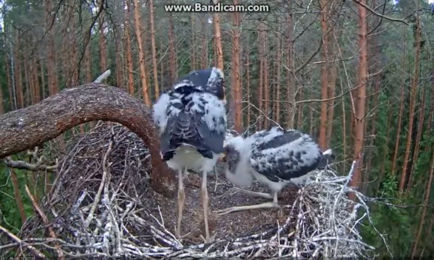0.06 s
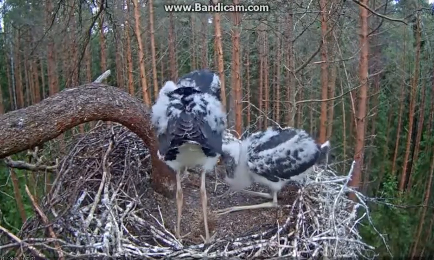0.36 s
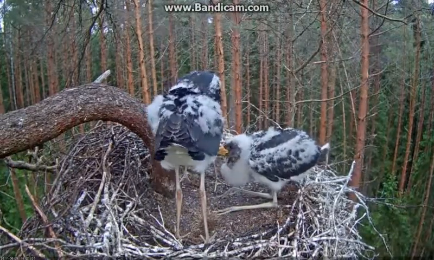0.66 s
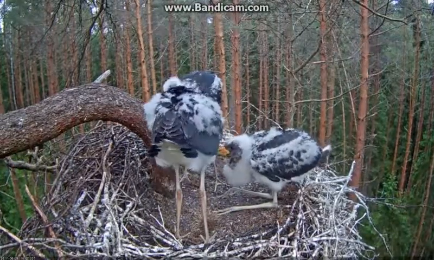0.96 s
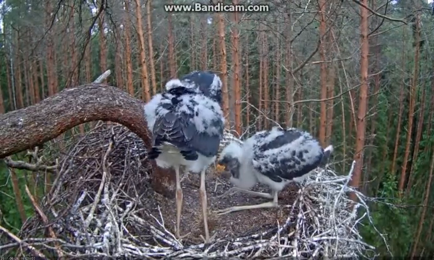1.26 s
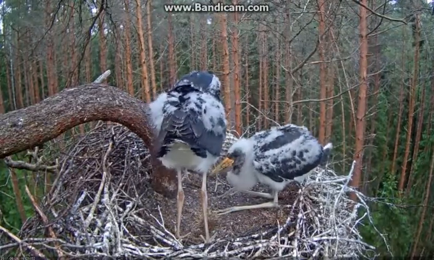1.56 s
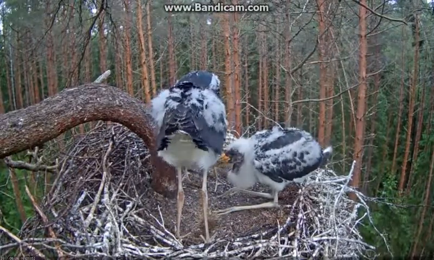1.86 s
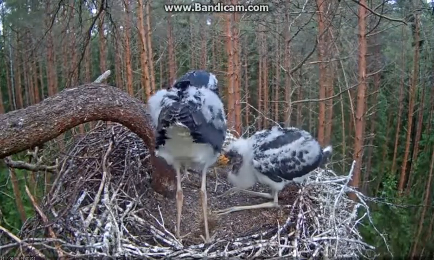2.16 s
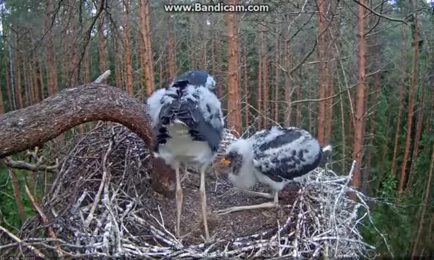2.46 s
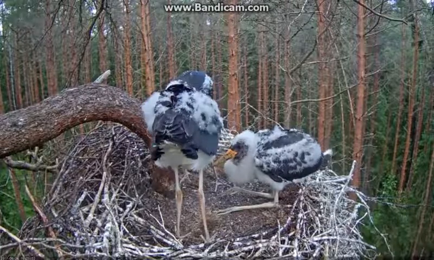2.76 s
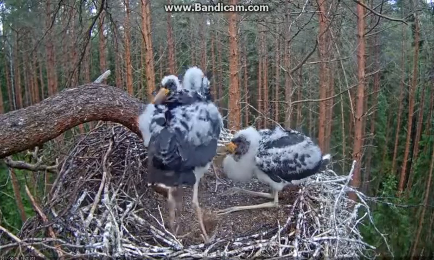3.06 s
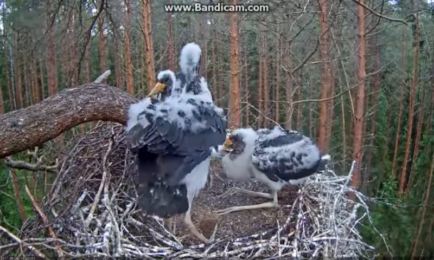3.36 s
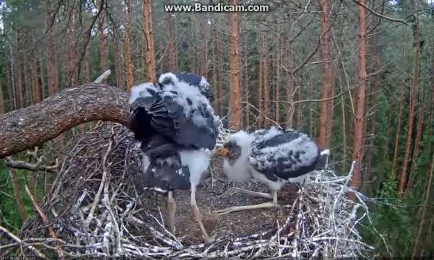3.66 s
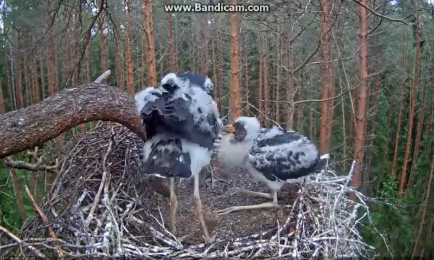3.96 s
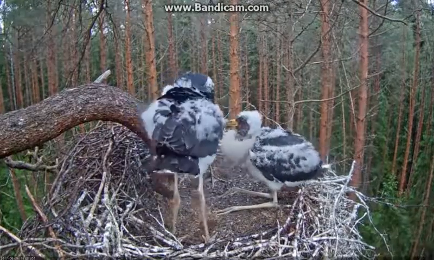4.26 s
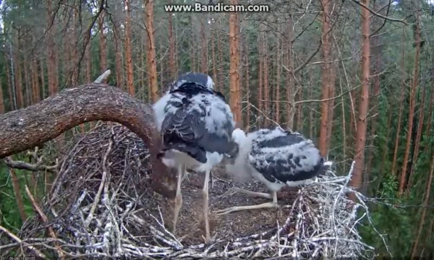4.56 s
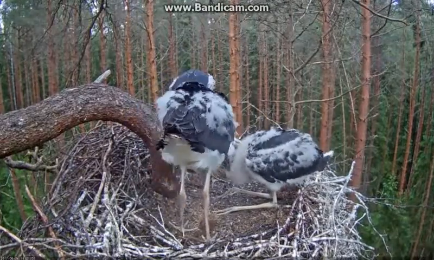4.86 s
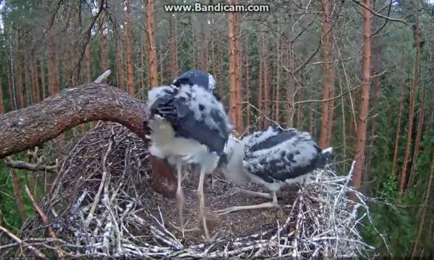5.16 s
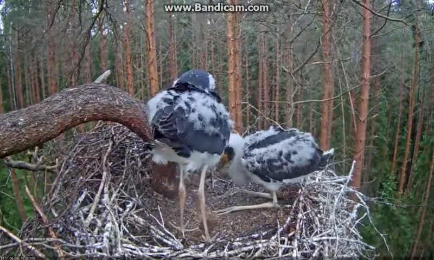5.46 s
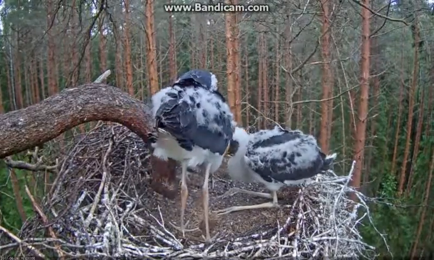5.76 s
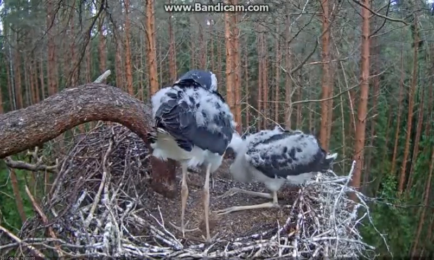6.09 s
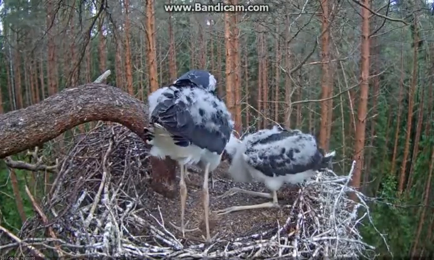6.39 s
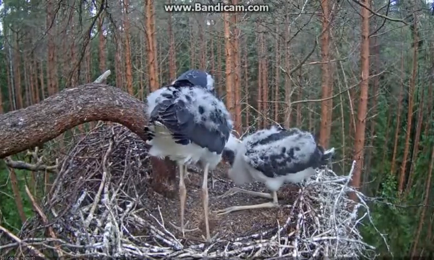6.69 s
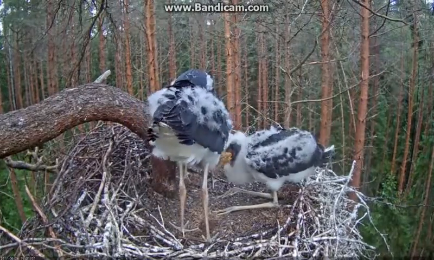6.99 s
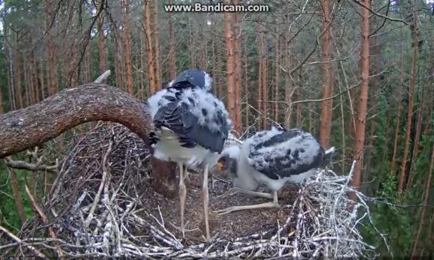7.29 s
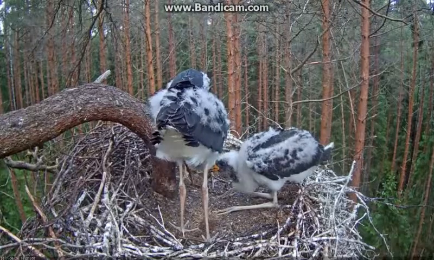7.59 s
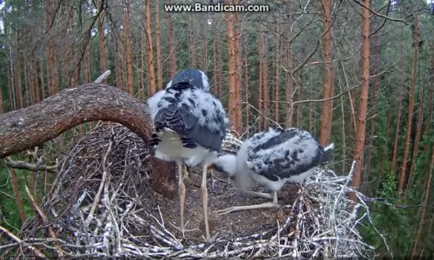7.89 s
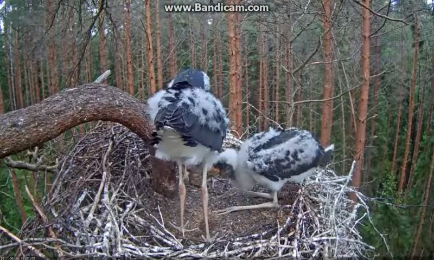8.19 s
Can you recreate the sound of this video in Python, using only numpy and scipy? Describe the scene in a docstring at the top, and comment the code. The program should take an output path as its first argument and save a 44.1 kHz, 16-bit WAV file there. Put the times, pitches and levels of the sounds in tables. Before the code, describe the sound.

Stork chicks beg on a stick nest in a pine forest. One calls in fast runs of about nine syllables a second, each a high whistled squeak ending in a rattling rasp and a small grunt, with brief pauses between runs. A second chick adds lower, wavering squeals in the later half. Feathers rustle, feet tick faintly on sticks and a small bird sings far off. The microphone sits beside the nest, in a steady soft hush.

```python
"""Stork chicks beg on a stick nest in a pine forest, about nine syllables a second.
In each syllable the syrinx whistles an arch of pitch that cracks into a short level note; then slack
membranes drive the throat with a pulse train, heard as a rattling rasp with a low grunt.
A second chick joins in lower down, feet excite the damped modes of the sticks, feathers rustle and
a small bird sings far off. The trunks scatter a short reverberation over the hush of the forest."""
import sys
import numpy as np
from scipy import signal
from scipy.fft import rfft, irfft, next_fast_len
from scipy.io import wavfile
from scipy.ndimage import map_coordinates

SR = 44100
rng = np.random.default_rng(int(sys.argv[2]) if len(sys.argv) > 2 else 0)


def wrap_up_sound(samples):
    """Save the sound to the file named by the first command line argument, as 16-bit audio."""
    columns = np.atleast_2d(samples).T
    # keep every value between -1 and 1, then stretch to whole-number steps
    tamed = np.clip(columns, -1, 1)
    steps = np.round(tamed * 32767).astype(np.int16)
    wavfile.write(sys.argv[1], SR, steps)


N = 372204
TIME = np.arange(N) / SR
TYPICAL_DB = -20   # reference level of a syllable

# begging syllables: (arch start t/s, arch end t/s, top f/Hz, rise level/dB, fall level/dB,
# grunt level/dB)
SYLLABLES = [(0.253, 0.29, 4530, -27, -18.5, -29.5), (0.33, 0.382, 3920, -20.5, -26, -22),
             (0.424, 0.481, 4510, -19.5, -20, -27), (0.552, 0.6, 4810, -15.5, -13, -24),
             (0.65, 0.699, 4700, -18, -15, -25), (0.758, .808, 5040, -16.5, -12.5, -22),
             (0.867, 0.915, 4890, -17, -13.5, -22), (0.966, 1.027, 4960, -19, -20.5, -26.5),
             (1.153, 1.206, 5300, -21.5, -46, -24.5), (1.267, 1.308, 3820, -23, -35, -79),
             (1.432, 1.471, 4580, -27, -18.5, -44), (1.514, 1.564, 4840, -16, -23, -29),
             (1.616, 1.673, 4600, -19.5, -21, -26), (1.73, 1.792, 4550, -21, -17, -35),
             (1.84, 1.906, 5020, -13.5, -15, -37), (1.95, 2.016, 4700, -16, -15.5, -40),
             (2.067, 2.136, 4900, -15, -10.5, -35), (2.181, 2.248, 4550, -16.5, -19, -25.5),
             (2.332, 2.41, 5150, -16.5, -75, -103), (2.593, 2.632, 4410, -33.5, -25, -56),
             (2.773, 2.827, 4650, -22.5, -22, -34), (2.882, 2.941, 4690, -20.5, -18.5, -36),
             (2.987, 3.057, 4550, -17.5, -16, -22), (3.101, 3.177, 4520, -13, -18, -24.5),
             (3.217, 3.284, 4620, -14, -16, -24), (3.335, 3.39, 4730, -11, -16, -22),
             (3.762, 3.801, 4140, -23, -21, -68), (3.817, 3.873, 3990, -18.5, -21, -19.5),
             (3.923, 3.979, 3960, -17, -26, -21), (4.022, 4.084, 4010, -15.5, -16.5, -22.5),
             (4.137, 4.211, 4160, -14, -22, -26), (4.256, 4.323, 4320, -15, -14.5, -26),
             (4.365, 4.434, 4470, -15, -11.5, -45), (4.475, 4.544, 4720, -15, -16, -72),
             (4.586, 4.645, 4700, -14, -13, -24.5), (4.826, 4.852, 3700, -45, -41, -71),
             (4.959, 5.019, 4730, -21, -24, -47), (5.05, 5.111, 4350, -18, -23.5, -28.5),
             (5.158, 5.217, 4460, -22, -26, -30), (5.268, 5.317, 4080, -19.5, -32, -37),
             (5.367, 5.433, 4800, -16.5, -22, -32), (5.488, 5.54, 4680, -20.5, -20, -73),
             (5.579, 5.65, 5220, -12, -11.5, -22.5), (5.687, 5.752, 4480, -16, -14, -30),
             (5.787, 5.85, 4190, -25.5, -15, -24.5), (6.168, 6.205, 4490, -28, -34, -55),
             (6.252, 6.302, 4480, -24.5, -26, -29), (6.36, 6.409, 4510, -24, -26, -30.5),
             (6.457, 6.522, 4780, -16, -29, -23.5), (6.568, 6.632, 4580, -16.5, -25, -29.5),
             (6.668, 6.744, 4550, -14, -15.5, -31), (6.786, 6.856, 4300, -12, -13.5, -27),
             (6.899, 6.966, 4420, -12.5, -14.5, -29), (7.015, 7.072, 4980, -12, -33, -29.5),
             (7.134, 7.176, 5300, -16.5, -53, -35), (7.239, 7.295, 4430, -38, -46, -28),
             (7.367, 7.42, 4800, -34, -36, -48), (7.462, 7.519, 4470, -18, -28, -40),
             (7.568, 7.633, 5070, -20, -23, -46), (7.675, 7.747, 4400, -19, -24, -55),
             (7.78, 7.854, 4250, -21.5, -20.5, -29), (7.901, 7.968, 4000, -26, -27, -25.5),
             (8.017, 8.075, 3805, -18.5, -21.5, -26), (8.131, 8.18, 4420, -38, -49, -71),
             (8.279, 8.347, 4170, -33, -66, -44)]
# fundamental of the grunts: (t/s, f/Hz)
GRUNT_PITCH = [(.4, 332.6), (1.06, 324.7), (1.24, 410.7), (2.17, 430), (2.28, 333), (2.8, 400), (4.4, 397),
               (4.68, 345.2), (5.2, 411), (5.7, 313.2), (5.9, 306.6), (6.4, 460), (7, 454), (8, 348.3)]


def from_db(db):
    """Amplitude ratio of a level: a factor of ten for every 20 dB."""
    return 10 ** (np.asarray(db) / 20)


def drift(rate, size):
    """Band-limited fluctuation: a spline through `rate` random values a second, spread about 1."""
    position = np.arange(size) * rate / SR
    return map_coordinates(rng.standard_normal(4096), [position], order=3, mode="wrap")


def colour(x, spectrum):
    """Minimum-phase filter with the shape of the given spectrum; white noise keeps its power."""
    size = 2 * next_fast_len(N // 2 + 4096)
    hz, db = np.transpose(spectrum)
    bins_hz = np.fft.rfftfreq(size, 1 / SR)
    gain = from_db(np.interp(np.log(bins_hz + 1), np.log(hz), db))
    gain /= np.sqrt(np.mean(gain ** 2))
    cepstrum = irfft(np.log(gain))
    cepstrum[1:size // 2] *= 2   # folding the cepstrum makes the filter causal
    cepstrum[size // 2 + 1:] = 0
    return irfft(rfft(x, size) * np.exp(rfft(cepstrum)))[:N]


def span(start, end):
    """The sampling instants between two times."""
    return TIME[max(int(start * SR), 0):max(int(end * SR), 2)]


def add(track, t, sound):
    """Superposition: a sound adds to the track at its sampling instants."""
    track[np.round(t * SR).astype(int)] += sound


def gate(t, start, end, edge):
    """Amplitude window from start to end, with smooth flanks of time scale `edge`."""
    return (1 + np.tanh((t - start) / edge)) * (1 + np.tanh((end - t) / edge)) / 4


def whistle(hz, overtone_db):
    """Oscillator whose phase is the integral of frequency, with a flickering second harmonic."""
    phase = 2 * np.pi * np.cumsum(hz) / SR
    overtone = from_db(overtone_db) * (1 + .5 * drift(886, len(hz)))
    return np.sqrt(2) * (np.sin(phase) + overtone * np.sin(2 * phase))


def glide(start, end, from_hz, to_hz, db, scatter_hz, flutter_db, overtone_db, waver_hz=0):
    """A linear sweep; random frequency modulation broadens it from a pure tone to a buzz."""
    out, t = np.zeros(N), span(start - .01, end + .01)
    hz = np.interp(t, [start, end], [from_hz, to_hz]) + scatter_hz * drift(1092, len(t))
    hz -= waver_hz * np.sin(np.pi * (t - start) / .055) ** 2   # one dip every 55 ms
    swell = from_db(db + flutter_db * drift(239.5, len(t))) * gate(t, start + .00024, end - .002, .0053)
    add(out, t, swell * whistle(hz, overtone_db))
    return out


def forest(level_db=-35):
    """Ambient noise: a broad continuous spectrum whose level wavers slightly."""
    # spectrum of the forest: (f/Hz, relative level/dB)
    spectrum = [(18, -56), (30, -30), (152, -3), (320, 3), (1100, -20), (1570, -16), (2040, -17),
                (2770, -23.5), (4630, -9), (7170, -14.5), (13000, -26.5), (14000, -36.5)]
    return from_db(level_db + drift(17, N)) * colour(rng.standard_normal(N), spectrum)


def feathers():
    """Brushing and flapping plumage radiates low, amplitude-modulated noise."""
    # envelope of the rustle: (t/s, level/dB)
    rustle = [(0, -52), (2.68, -60), (2.83, -39.5), (3.13, -30.5), (3.45, -64), (4.3, -45), (5.1, -50),
              (5.6, -40), (6.06, -33), (6.5, -40.5), (7.1, -61)]
    # spectrum of the plumage: (f/Hz, relative level/dB)
    plumage = [(25, -17), (60, 0.5), (130, 0.5), (250, 5.5), (450, -24), (1000, -79)]
    db = np.interp(TIME, *np.transpose(rustle)) + 2 * drift(40, N)
    return from_db(db) * colour(rng.standard_normal(N), plumage)


def songbird(slur_from_hz=3700, slur_to_hz=3010, buzz_end_ratio=.9):
    """Falling sweeps of a small bird: weak frequency modulation gives slurs, strong gives buzzes."""
    # pure down-slurs: (start t/s, end t/s, level/dB)
    slur_notes = [(.003, 0.051, -37), (0.109, 0.116, -25.5), (0.185, 0.191, -22.5), (3.515, 3.536, -29),
                  (3.681, 3.703, -24.5)]
    # buzzes: (start t/s, end t/s, start f/Hz, level/dB)
    buzz_notes = [(1.265, 1.378, 6910, -33), (1.36, 1.409, 5840, -34), (3.443, 3.51, 4950, -29),
                  (3.542, 3.63, 4200, -34.5), (3.632, 3.68, 4850, -30.5)]
    slurs = sum(glide(start, end, slur_from_hz, slur_to_hz, db,
                      scatter_hz=30, flutter_db=5, overtone_db=-47)
                for start, end, db in slur_notes)
    buzzes = sum(glide(start, end, hz, hz * buzz_end_ratio, db,
                       scatter_hz=242, flutter_db=4, overtone_db=-47)
                 for start, end, hz, db in buzz_notes)
    return slurs + buzzes


def steps(level_db=-4):
    """Impact excitation: each footfall sets the sticks ringing in exponentially damped modes."""
    # feet on the nest: (t/s, relative level/dB)
    footfalls = [(.01, -43), (0.155, -52), (0.205, -54), (0.226, -44), (1.342, -44), (1.373, -46.5),
                 (2.283, -39.5), (2.306, -41), (2.562, -47.5), (3.653, -49), (3.737, -47.5), (4.3, -42.5)]
    # modes of the sticks: (f/Hz, relative level/dB, 60 dB decay time t/s)
    modes = [(299.6, 28.5, 0.088), (444, 25, 0.031), (646, 21.5, 0.056), (1277, 17, 0.042),
             (1420, 18, 0.018), (2460, 17, 0.03)]
    knocks = np.zeros(N)
    for start, force_db in footfalls:
        t = span(start, start + .081)
        age = t - t[0]
        for hz, mode_db, t60 in modes:
            peak_db = level_db + force_db + mode_db + rng.normal(0, 2.55)
            mode_hz = hz * rng.uniform(.805, 1.17)
            add(knocks, t, from_db(peak_db - 60 * age / t60) * np.sin(2 * np.pi * mode_hz * age))
    radiation = signal.butter(2, 220, "high", fs=SR, output="sos")   # thin sticks radiate no bass
    return signal.sosfilt(radiation, knocks)


def syllables(typical_note_hz=3304, typical_top_hz=4500, typical_grunt_hz=390):
    """Covariation in one voice: the level note follows its syllable in pitch and strength."""
    # hoarseness of the voice, bout by bout: (t/s, relative level/dB)
    hoarse_levels = [(.3, -25), (1, -18.5), (1.2, -29.5), (1.65, -57), (1.99, -41), (2.09, -21.5),
                     (2.23, -23.5), (2.55, -39), (2.9, -74), (3.04, -19.5), (3.36, -21.5), (3.75, -32.5),
                     (4.15, -24.5), (5.58, -27), (5.71, -58), (5.86, -51), (6.16, -27), (7.15, -28.5),
                     (7.28, -24), (8.4, -29)]
    for start, end, top_hz, rise_db, fall_db, grunt_db in SYLLABLES:
        tension_hz = np.interp(end, *np.transpose(GRUNT_PITCH)) - typical_grunt_hz
        note_hz = typical_note_hz + .124 * (top_hz - typical_top_hz) + 2.1 * tension_hz
        note_hz += rng.normal(0, 49)
        note_db = -17.5 + .51 * ((rise_db + fall_db) / 2 - TYPICAL_DB)
        note_s = np.interp(grunt_db, [-45, -20], [.03, .017])   # a strong grunt cuts the note short
        hoarse_db = np.interp((start + end) / 2, *np.transpose(hoarse_levels))
        yield start, end, top_hz, rise_db, fall_db, note_hz, note_db, note_s, hoarse_db


def hoarseness(hiss_db=-11.5, squeak_db=-3, squeak_hz=3350, grain_db=5.5, lead_s=.022, tail_s=.023):
    """Flow noise hisses unevenly through the bill; strained membranes squeak at a chaotic pitch."""
    # spectrum of air in the bill: (f/Hz, relative level/dB)
    bill = [(300, -2), (1000, -6.5), (1900, 10.5), (2600, 11), (3500, -16.5), (4500, 24), (5400, 18.5),
            (6600, 13), (7400, 8), (8400, 9), (10000, -1), (14000, -9)]
    power, squeaks = np.zeros(N), np.zeros(N)
    for start, end, *_, hoarse_db in syllables():
        t = span(start - .05, end + .07)
        strain = from_db(hoarse_db) * gate(t, start - lead_s, end + tail_s, .0018)
        add(power, t, (strain * from_db(grain_db * drift(601.4, len(t)))) ** 2)
        hz = squeak_hz + 450 * drift(200, len(t))
        add(squeaks, t, strain * drift(251.2, len(t)) * whistle(hz, overtone_db=-53))
    hiss = colour(np.sqrt(power) * rng.standard_normal(N), bill)
    return from_db(hiss_db) * hiss + from_db(squeak_db) * squeaks


def arches(foot_hz=3450, fold_hz=950, fold_s=.00667, crack_s=.00587, sag_hz_per_s=4000,
           level_db=-.5, shimmer_db=4, crack_db=-6, upper_db=-7, lower_db=-4):
    """Oscillation of the syrinx: an arched whistle whose pitch breaks down and up at both feet."""
    # the whistle thins out as it climbs: (f/Hz, relative level/dB)
    thinning = [(4100, 0), (4450, -6), (4700, -13), (5000, -24)]
    out = np.zeros(N)
    for start, end, top_hz, rise_db, fall_db, note_hz, note_db, note_s, hoarse_db in syllables():
        t = span(start - .015, end + .05)
        along = (2 * t - start - end) / (end - start)   # -1 to 1 over the arch
        depth_hz = np.clip(top_hz - foot_hz, 750, 1400)
        arch_hz = top_hz - depth_hz * np.minimum(np.abs(along), 1) ** 1.9   # nearly a parabola
        arch_hz += 55 * drift(167, len(t))
        held_hz = note_hz - sag_hz_per_s * (t - end - .013)   # the level note sags a little
        from_crack = np.minimum(np.abs(t - start + .0009), np.abs(t - end - .001))
        cracking = np.exp(-(from_crack / crack_s) ** 2)
        folds = np.clip(.35 * drift(450, len(t)) - np.cos(2 * np.pi * from_crack / fold_s), -1.2, .55)
        jitter_hz = 45 * drift(592, len(t))
        hz = np.where(t < end, arch_hz, held_hz) + jitter_hz + fold_hz * cracking * folds

        db = level_db + np.interp(along, [-.4, .4, 1, 1.1], [rise_db, fall_db, fall_db, note_db])
        db += np.interp(arch_hz, *np.transpose(thinning))
        db += crack_db * cracking * np.maximum(-folds, 0)   # the dives are weak
        db += shimmer_db * drift(257, len(t))
        roughness = from_db(np.clip(hoarse_db - fall_db, -20, 0) / 2)
        db += 2 * roughness * drift(1300, len(t))   # hoarse syllables rattle
        swell = from_db(db) * gate(t, start - .004, end + note_s, .003)
        add(out, t, swell * whistle(hz, overtone_db=np.where(t < end, -22, -19)))

        # biphonation: the other side of the syrinx sounds weak lines above and below the arch
        upper_hz = 1.24 * arch_hz + 90 * drift(1043, len(t))
        upper = from_db(upper_db) * whistle(upper_hz, overtone_db=-22)
        lower_hz = .66 * top_hz - 550 * along + 130 * drift(489.4, len(t))
        lower = from_db(lower_db) * whistle(lower_hz, overtone_db=-30)
        add(out, t, from_db(hoarse_db) * gate(t, start + .014, end - .008, .025) * (upper + lower))
    return out


def grunts(delay_s=.033):
    """Excitation of the rasps: one ends each syllable and grows with its strength; some come alone."""
    # rasps off the beat: (t/s, rattle level/dB, grunt f/Hz, grunt level/dB)
    lone_rasps = [(.269, -28, 395, -23), (.375, -27.5, 424, -24), (.47, -30, 429, -26.5),
                  (.58, -31, 439, -21.5), (.693, -26.5, 460, -21.5), (1.02, -28, 444, -23.5),
                  (1.124, -21, 389.4, -23), (2.103, -32, 438, -22.5), (2.753, -26.5, 403, -32),
                  (4.205, -25, 372, -22.5), (4.303, -23.5, 425, -28), (4.952, -21.5, 320, -33),
                  (7.74, -22, 364.5, -44), (7.839, -24, 432, -41), (7.943, -27.5, 431, -33),
                  (8.176, -25, 319, -27.5), (8.425, -27.5, 335.6, -30)]
    for _, end, _, rise_db, _, grunt_db in SYLLABLES:
        at = end + delay_s
        rattle_db = -22.5 + .35 * ((rise_db + grunt_db) / 2 - TYPICAL_DB)
        yield at, rattle_db, np.interp(at, *np.transpose(GRUNT_PITCH)), grunt_db
    yield from lone_rasps


def rasps(jitter=.085, uneven_db=3, puff_s=.0063, slap_db=-2, puff_db=-5, scrap_db=-5, steady_hz=480):
    """Source and filter: slack membranes slap once a grunt cycle and excite the throat's resonances."""
    # response of the throat: (f/Hz, relative level/dB)
    throat = [(150, -65.5), (450, 3.5), (1000, -9.5), (1600, -4.5), (2200, 3.5), (2700, 5), (3400, 9),
              (4200, 1.5), (5100, -2.5), (6500, -3), (7400, -12), (8400, -9.5), (10000, -17), (14000, -32)]
    slaps, tones = np.zeros(N), np.zeros(N)
    for at, rattle_db, grunt_hz, grunt_db in grunts():
        t = span(at - .045, at + .045)
        sag_per_s = 22 * (steady_hz / grunt_hz - 1)   # the lower the grunt, the faster it sinks
        hz = grunt_hz * np.exp(-sag_per_s * (t - at) + jitter * drift(300, len(t)))
        cycles = np.cumsum(hz) / SR
        closing = np.diff(np.floor(cycles), prepend=0) > 0
        force = from_db(rattle_db + uneven_db * drift(509, len(t)))
        force *= gate(t, at - .02, at + .014, .0035)
        add(slaps, t, closing * force * np.sqrt(SR / grunt_hz))
        grunt = from_db(grunt_db) * whistle(hz, overtone_db=-13.5)
        add(tones, t, gate(t, at - .01, at + .01, .0055) * grunt)
        # scraps of the whistle break through the first half of the rasp
        scraps = whistle(3300 + 500 * drift(350, len(t)), overtone_db=-24)
        add(tones, t, from_db(scrap_db) * force * gate(t, at - .03, at, .0021) * scraps)
    decay = np.exp(-2 / (puff_s * SR))   # each slap lets out a short puff of air
    puff_power = signal.lfilter([1 - decay], [1, -decay], slaps ** 2 + 1e-18)
    puffs = np.sqrt(puff_power) * rng.standard_normal(N)
    return colour(from_db(slap_db) * slaps + from_db(puff_db) * puffs, throat) + tones


def peep():
    """A soft, low sweep with a strong second harmonic."""
    # the peep: (start t/s, end t/s, start f/Hz, end f/Hz, level/dB)
    notes = [(2.43, 2.442, 1175, 1085, -25.5)]
    return sum(glide(*note, scatter_hz=15, flutter_db=1, overtone_db=-4) for note in notes)


def second_chick(sag_hz_per_s=4700, air_db=-5):
    """Lower squeals waver and sink; noise modulated by the voice gives them a husky edge."""
    # squeals: (start t/s, end t/s, start f/Hz, level/dB)
    squeals = [(3.125, 3.135, 3524, -9), (4.852, 4.963, 3180, -28.5), (4.984, 5.055, 2960, -24.5),
               (5.097, 5.172, 3340, -23), (5.194, 5.264, 3016, -27), (5.298, 5.387, 3070, -27),
               (5.375, 5.448, 2986, -26.5), (6.269, 6.305, 3420, -21), (6.364, 6.488, 3096, -27.5),
               (7.292, 7.394, 3250, -24.5), (7.388, 7.465, 2950, -26), (7.454, 7.557, 3030, -25.5),
               (7.868, 7.983, 2413, -32.5), (8.044, 8.154, 3256, -24), (8.198, 8.296, 3200, -27),
               (8.323, 8.43, 2970, -31)]
    # spectrum of the husky edge: (f/Hz, relative level/dB)
    husk = [(500, -3), (1300, 1), (2100, 16.5), (3200, 19), (12000, -54)]
    voice = sum(glide(start, end, hz, hz - sag_hz_per_s * (end - start), db,
                      scatter_hz=80, flutter_db=5.5, overtone_db=-30, waver_hz=331.8)
                for start, end, hz, db in squeals)
    return voice + from_db(air_db) * colour(voice * rng.standard_normal(N), husk)


def trunks(x, echo_db=-20, t60=.23):
    """Scattering from the trunks adds a diffuse, exponentially decaying tail to the direct sound."""
    t = span(0, .6)
    tail = rng.standard_normal(len(t)) * from_db(-60 * t / t60) * (t > .008)
    return x + from_db(echo_db) * signal.fftconvolve(x, tail / np.linalg.norm(tail))[:N]


def scene():
    """All sources superpose at one point beside the nest, the same in both channels."""
    nest = trunks(peep() + steps() + arches() + hoarseness() + rasps() + second_chick())
    far_song = trunks(songbird(), echo_db=-.5, t60=.42)   # far off, the tail rivals the direct sound
    return np.tile(nest + far_song + feathers() + forest(), (2, 1))


def record(dry, cutoff_hz=13900):
    """Clipping at full scale, then band limiting by a steep low-pass filter."""
    low_pass = signal.ellip(10, .1, 80, cutoff_hz, fs=SR, output="sos")
    return signal.sosfilt(low_pass, np.clip(dry, -1, 1))


dry = scene()
out = record(dry)
wrap_up_sound(out)
```